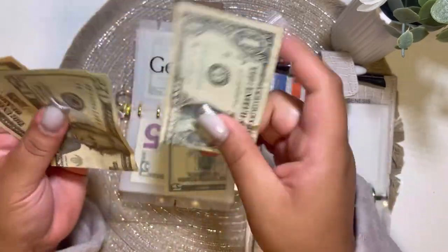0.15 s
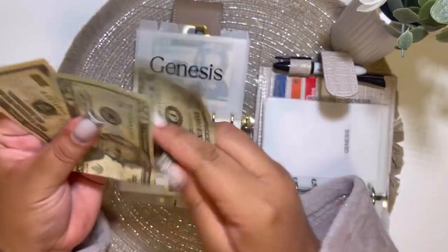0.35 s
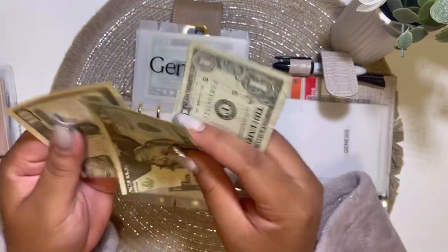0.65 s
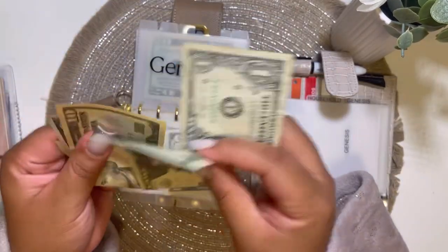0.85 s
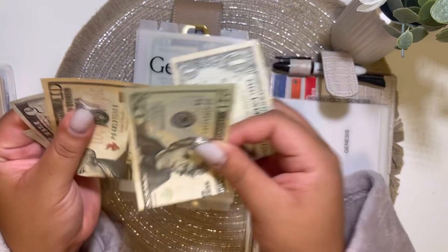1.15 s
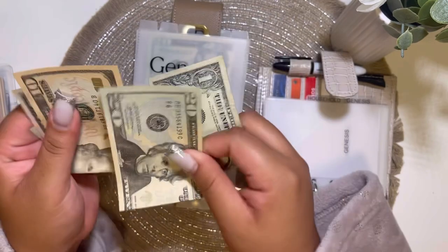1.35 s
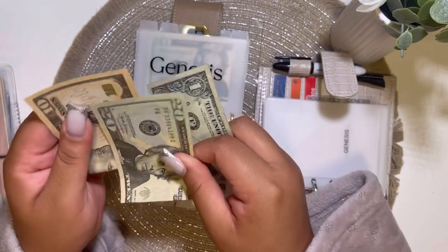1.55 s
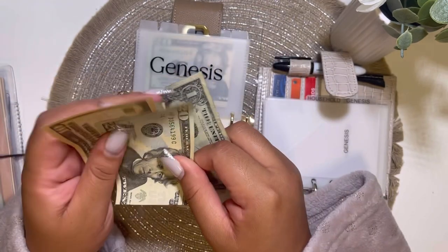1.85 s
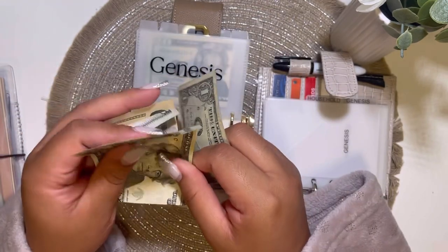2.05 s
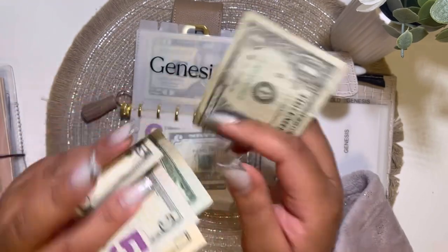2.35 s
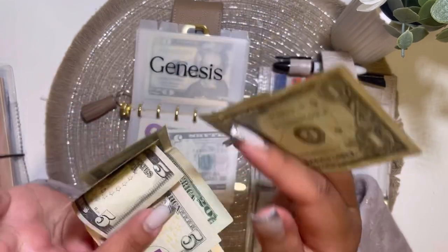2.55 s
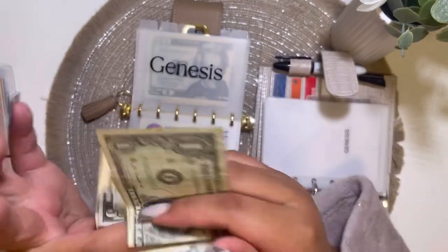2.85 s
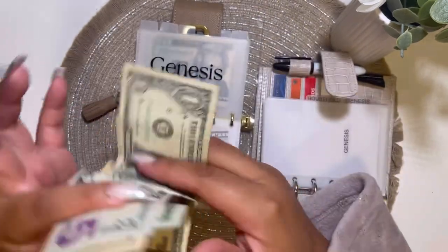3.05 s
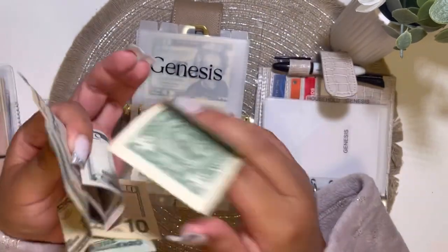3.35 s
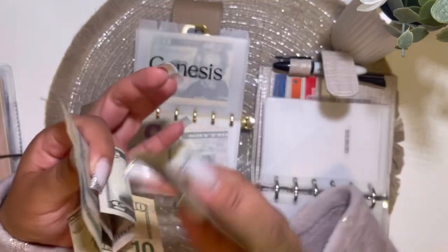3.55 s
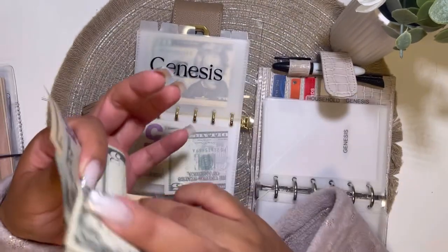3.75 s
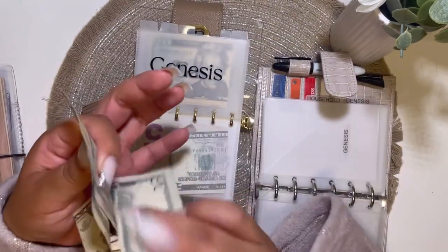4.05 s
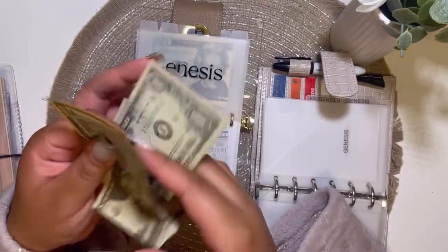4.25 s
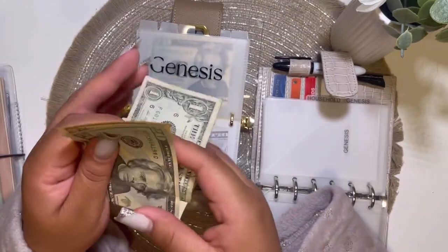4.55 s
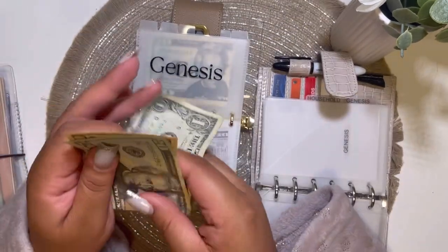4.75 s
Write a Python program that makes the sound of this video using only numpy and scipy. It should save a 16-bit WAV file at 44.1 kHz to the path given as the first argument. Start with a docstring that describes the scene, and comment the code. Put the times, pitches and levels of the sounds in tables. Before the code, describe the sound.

Close stereo sound of worn banknotes counted by hand over a desk in a small, quiet room. Light, grainy rubbing opens, with crisp snaps at about 0.3 and 0.4 seconds and a busier swish and crackle from 0.5 to 0.7. Softer dragging follows, then a clear swish with a bright snap near 1.3. Gentle rubbing continues until firmer swishes around 1.95 to 2.25, the last one strong. After a short lull, the loudest passage comes from 2.75 to 3.0: hard creases cracking over vigorous rustling and a low puff of air. Crackles thin out until about 3.25, with a quiet stretch after. Another tight cluster of swishes and snaps runs from 3.6 to 3.9. The end is lighter: faint crackles and fizzy rubbing after 4.1, one distinct flick near 4.7, then subdued rustling. Soft finger dabs, low hand rumble and faint room air lie beneath.

```python
"""Banknotes counted by hand

Worn banknotes are counted over a desk in a small room, close to a two-port microphone.
Bills rub across each other and the fingers: dense stick-slip grains through the sheet's wandering resonances.
Creases snap through and send bending waves along the sheet, whose low notes arrive late.
Finger pads dab softly, the hands stir a low rumble, and desk and room reflect the paper over still air."""
import sys
import numpy as np
from scipy import signal
from scipy.fft import rfft, irfft, next_fast_len
from scipy.io import wavfile

SR = 44100
rng = np.random.default_rng(int(sys.argv[2]) if len(sys.argv) > 2 else 0)


def output_pcm(signal):
    """Save a mono or channel-first signal as 16-bit PCM at the path in sys.argv[1].

    Samples are clipped to [-1, 1] before scaling.
    """
    pcm = np.clip(np.atleast_2d(signal).T, -1, 1) * 32767
    wavfile.write(sys.argv[1], SR, np.round(pcm).astype(np.int16))


N = 215604
TIME = np.arange(N) / SR


def from_db(db):
    """Amplitude factor of a level in dB."""
    return 10 ** (np.asarray(db) / 20)


def rms_one(x):
    """Scale to an rms of 1."""
    return x / np.sqrt(np.mean(x ** 2) + 1e-20)


def at_hz(points, hz):
    """Read a spectrum on a log-frequency axis."""
    point_hz, value = np.transpose(points)
    return np.interp(np.log(np.maximum(hz, 1)), np.log(point_hz), value)


def in_time(rows):
    """Each column of a curve, at every sample."""
    time_s, *columns = np.transpose(rows)
    return [np.interp(TIME, time_s, column) for column in columns]


def drift(rate):
    """Smooth chance with rms 1, about rate new values a second."""
    knots = rng.standard_normal(int(rate * N / SR) + 2)
    return rms_one(np.interp(TIME * rate, np.arange(len(knots)), knots))


def bandpass(x, low_hz, high_hz):
    """The part of a sound between two edges."""
    return signal.sosfilt(signal.butter(2, [low_hz, high_hz], "band", fs=SR, output="sos"), x)


def treble(x, edge_hz):
    """The part of a sound above an edge."""
    return signal.sosfiltfilt(signal.butter(3, edge_hz, "high", fs=SR, output="sos"), x)


def colour(x, spectrum):
    """Causal minimum-phase filter with the given spectrum; white noise keeps its power."""
    size = 2 * next_fast_len(N)
    gain = rms_one(from_db(at_hz(spectrum, np.fft.rfftfreq(size, 1 / SR))))
    # folding the cepstrum forward in time makes the filter causal
    cepstrum = irfft(np.log(gain))
    cepstrum[1:size // 2] *= 2
    cepstrum[size // 2 + 1:] = 0
    response = np.exp(rfft(cepstrum))
    return irfft(rfft(x, size) * response)[..., :N]


def tilt_db(hz, low_db, high_db):
    """The whole sheet sounds below about 1 kHz, single fibres above 5 kHz."""
    return at_hz([(650, low_db), (1500, 0.032), (4000, 0.045), (6300, high_db)], hz)


def bell(hz, centre_hz, octaves):
    """A resonance hump of height 1."""
    return np.exp(-(np.log2((hz + 1) / centre_hz) / octaves) ** 2)


def hump(hz, centre_hz, octaves):
    """A fold gathers the middle range into one resonance, at the cost of the rest of that range."""
    middle = 1 - tilt_db(hz, 0.82, 0.84)
    return bell(hz, centre_hz, octaves) - 0.46 * middle


def handling():
    """Drags and swishes add in power; each lends the paper its colour as far as it dominates.
    Gives friction, fizz, drumming, fold resonance and its height at every sample."""
    # a bill drawn steadily across the others; fizz of the fibres and drumming of the sheet are relative:
    # start_s, length_s, friction_db, fizz_db, drumming_db, fold_hz, fold_height_db
    drag_rows = [(0.0, 0.21, -56, 8.5, -0.5, 3570, 3), (0.316, 0.35, -54, 5.5, 9, 2500, 1),
                 (0.71, 0.23, -53.5, 7.5, 1, 2400, 0), (0.964, 0.084, -55, 5.5, -1.5, 2510, 4),
                 (1.455, 0.51, -55.5, -5, 0.5, 3000, -6.5), (2.304, 0.115, -64, 7, 4.5, 2060, 2.5),
                 (2.575, 0.15, -54, 4.5, 9, 1860, 6), (2.782, 0.374, -47.5, 4.5, -3.5, 2600, 7.5),
                 (3.32, 0.29, -62.5, -6.5, 9.5, 1770, 12), (4.154, 0.34, -55, 2.5, -0.5, 3000, 5),
                 (4.582, 0.23, -55, 0, 3, 2200, 3)]
    # a bill pulled free or pushed home in one swish; swell and fade are roughly the time per 20 dB:
    # fastest_s, swell_s, fade_s, friction_db, fizz_db, drumming_db, fold_hz, fold_height_db
    swish_rows = [(0.01, 0.05, 0.088, -49, 8.5, 10, 3570, -1), (0.40, 0.047, 0.11, -47, 5, 0, 2800, 5),
                  (0.495, 0.09, 0.089, -49.5, 11.5, 5.5, 2400, 2),
                  (0.592, 0.071, 0.054, -39.5, 2, 0, 2000, -8),
                  (1.103, 0.064, 0.058, -43.5, -3.5, -5, 4430, 12),
                  (1.28, 0.042, 0.1, -36.5, -2.5, -11.5, 3200, 12),
                  (1.39, 0.28, 0.27, -45.5, 4.5, -4.5, 3300, 5),
                  (1.731, 0.08, 0.035, -44.5, -6, -3, 3400, 3),
                  (1.961, 0.25, 0.15, -41, -9, -4, 1970, -0.5), (2.16, 0.1, 0.091, -41, -7, 4.5, 1690, 5.5),
                  (2.237, 0.062, 0.05, -34.5, 1, -9, 2060, -0.5),
                  (2.765, 0.025, 0.12, -44, 8, 0.5, 2780, 20), (2.835, 0.08, 0.13, -39, -10.5, -1, 2600, 2),
                  (2.98, 0.1, 0.17, -48.5, 12.5, -7, 2800, -4), (3.2, 0.12, 0.15, -42.5, 4, 1.5, 3300, -3),
                  (3.665, 0.042, 0.06, -38, 1, -3.5, 1900, 10),
                  (3.703, 0.047, 0.052, -39, -4, 2.5, 2030, 1),
                  (3.878, 0.095, 0.041, -40.5, -6, 3, 1900, 0),
                  (4.235, 0.13, 0.095, -58.5, 22, 9, 3000, -6),
                  (4.672, 0.088, 0.017, -44, -2, 8.5, 2400, 0)]
    # bills merely held: friction_db, fizz_db, drumming_db, fold_hz, fold_height_db
    resting_grip = (-86, 2, 2, 2000, 4.5)
    drag_attack_s, drag_release_s = 0.041, 0.1   # roughly the time to gain or lose 20 dB
    round_top = 0.11   # hands cannot turn sharply: share of a swell or fade over which its crest is rounded

    t = TIME[::40]
    moves = [(start, start + length, drag_attack_s, drag_release_s, *sound)
             for start, length, *sound in drag_rows]
    moves += [(fastest, fastest, *rest) for fastest, *rest in swish_rows]
    powers = [np.full(len(t), from_db(resting_grip[0]) ** 2)]
    shades = [resting_grip[1:]]
    for start, end, attack, release, level_db, *shade in moves:
        # distance from the move, in steps of 20 dB
        away = np.maximum(start - t, 0) / attack + np.maximum(t - end, 0) / release
        away = np.hypot(away, round_top) - round_top
        powers.append(from_db(level_db - 20 * np.minimum(away, 10)) ** 2)
        shades.append(shade)
    total = np.sum(powers, axis=0)
    blend = np.transpose(powers / total) @ np.array(shades)
    return in_time(np.column_stack([t, 10 * np.log10(total), blend]))


def slips(per_s, spread_db):
    """Tiny stick-slip releases at random moments, of uneven size; rms 1."""
    sizes_db = spread_db * np.minimum(rng.exponential(1, N), 4)
    sizes = from_db(sizes_db) * rng.choice([-1, 1], N)
    return rms_one(sizes * (rng.random(N) < per_s / SR))


def rubbing(judder_db, patchy_db, bend_octaves, crinkle_db):
    """Dense slips and a few larger crinkles excite the sheet, whose resonances wander as it bends."""
    friction_db, fizz_db, drumming_db, fold_hz, fold_height_db = handling()
    crinkles = from_db(crinkle_db) * slips(per_s=90, spread_db=3.0)
    grains = [slips(per_s=7000, spread_db=2.5) + crinkles for _ in range(2)]
    level_db = friction_db + judder_db * drift(140)
    edges = np.geomspace(215, 12500, num=25)
    out = np.zeros(N)
    for k, (low, high) in enumerate(zip(edges, edges[1:])):
        hz = np.sqrt(low * high)
        # neighbouring bands take turns at the two grain streams and alternate in sign
        band = bandpass(grains[k % 2], low, high) * (-1) ** k
        shade_db = tilt_db(hz, 0.84, 0) * drumming_db + tilt_db(hz, 0, 0.81) * fizz_db
        shade_db += hump(hz, fold_hz, bend_octaves) * fold_height_db
        out += band * from_db(level_db + shade_db + patchy_db * drift(35))
    return out


def top_octave(bills, edge_hz):
    """What firm rubbing adds to the highest treble, or light rubbing takes from it."""
    neutral_db, follows, range_db = -51, 0.58, 7.5   # neutral friction, dB per dB of friction, largest move
    friction_db = handling()[0]
    lift_db = np.clip(follows * (friction_db - neutral_db), -range_db, range_db)
    return (from_db(lift_db) - 1) * treble(bills, edge_hz)


def rumble(low_hz, top_hz):
    """Soft low noise of stirred air, swelling as a hand or a flapping bill wafts air at the microphone."""
    # wafts, levels ahead of the mix; at the half length the power is down to 1/e:
    # strongest_s, level_db, half_length_s
    waft_rows = [(0.325, -57.5, 0.016), (0.53, -63, 0.18), (1.12, -64.5, 0.033), (1.62, -71, 0.07),
                 (1.95, -63.5, 0.059), (2.22, -67, 0.1), (2.78, -64, 0.14), (2.94, -49.5, 0.029),
                 (3.035, -57, 0.02), (3.19, -64.5, 0.12), (3.735, -57.5, 0.025), (3.88, -70, 0.04),
                 (4.28, -69.5, 0.093), (4.87, -63, 0.05)]
    stir_db = -75   # between wafts, ahead of the mix
    power = from_db(stir_db) ** 2
    for s, level_db, half_length in waft_rows:
        power = power + from_db(level_db) ** 2 * np.exp(-((TIME - s) / half_length) ** 2)
    air = bandpass(rng.standard_normal(N), low_hz, top_hz)
    return rms_one(air) * np.sqrt(power)


def still_air(level_db):
    """Steady noise in the colour of the quiet room."""
    # still air of the room, relative density: pitch_hz, density_db (per Hz)
    hush_spectrum = [(25, -8), (50, 10), (75, 5), (130, -2), (300, 5.5), (800, -33.5), (2000, -11),
                     (4000, -34), (11000, -55.5), (13500, -64.5)]
    return from_db(level_db) * colour(rng.standard_normal(N), hush_spectrum)


def snaps(crease_db, crease_octaves, crackle_db, uneven_db, tick_db, push_db, bass_lag_s, bend_hz):
    """Each snap is a tick, a burst of breaking creases and a push on the sheet, spread out as a bending wave."""
    # the clearest creases giving way and edges flicking free; level ahead of a gain that grows with length,
    # fizz and flex relative to it, knock the hollow note of the sheet:
    # moment_s, level_db, length_s, crease_hz, fizz_db, flex_db, knock_hz
    snap_rows = [(0.0282, -44.5, 0.0024, 7840, 5, 13, 700), (0.1944, -54, 0.00089, 7200, 25.5, 3, 600),
                 (0.3022, -32.5, 0.0027, 5570, 2, 3, 570), (0.306, -39, 0.0051, 5660, 2, 9.5, 260),
                 (0.3996, -31, 0.013, 3570, -3, 4, 497), (0.551, -27, 0.0063, 2480, -3.5, 2, 693),
                 (0.583, -28.5, 0.0056, 4000, -14, -5, 850), (0.634, -36.5, 0.0075, 1400, -25, 7.5, 600),
                 (0.697, -32.5, 0.0076, 2450, -1, -9, 640), (1.3034, -24.5, 0.002, 3400, -5.5, -13, 470),
                 (1.4824, -41.5, 0.0057, 3200, -10, 0, 600), (1.738, -38, 0.007, 3300, -3, 5.5, 660),
                 (2.034, -40, 0.0075, 2100, -9, 6, 380), (2.1622, -34.5, 0.012, 3750, -2, -3, 760),
                 (2.1782, -32.5, 0.0025, 2100, -2, 5.5, 590), (2.242, -33.5, 0.0094, 5900, -2.5, 8, 543),
                 (2.457, -49.5, 0.0019, 2400, -8, -8, 600), (2.753, -29.5, 0.0057, 2750, -8, -22, 400),
                 (2.816, -30.5, 0.011, 2200, -24, 3, 570), (2.8442, -19, 0.0029, 6470, -1.5, 7, 412),
                 (2.9191, -17.5, 0.0056, 1600, -1.5, 2, 320), (2.9522, -19, 0.0032, 1190, -0.5, 7.5, 526),
                 (3.026, -30.5, 0.0079, 2000, -15.5, 5, 500), (3.116, -29, 0.0099, 3900, 1.5, -30, 560),
                 (3.136, -29, 0.01, 1690, -10, -1, 467), (3.17, -40.5, 0.011, 7950, 8, -2, 600),
                 (3.2047, -31.5, 0.011, 8760, 1.5, -12, 800), (3.2394, -44, 0.0083, 1100, 9, 15, 493),
                 (3.617, -38, 0.0032, 2110, -9, -11, 510), (3.679, -31, 0.012, 2000, -16, 5, 458),
                 (3.696, -30.5, 0.0054, 1840, 4.5, -12, 480), (3.7103, -31.5, 0.0053, 6300, 1.5, 4.5, 470),
                 (3.81, -40, 0.0092, 1700, -15, 8.5, 530), (3.842, -34, 0.015, 7700, -3.5, 1, 540),
                 (3.871, -30, 0.0055, 8000, -1.5, 0, 540), (3.8767, -28.5, 0.0087, 2900, -2.5, 5.5, 450),
                 (3.8864, -24.5, 0.0055, 3800, 1.5, 2, 501), (4.096, -55, 0.0034, 1900, -13, 1.5, 600),
                 (4.1232, -43.5, 0.0087, 6030, -3.5, -3.5, 400), (4.1332, -40, 0.0041, 6500, -7, 0, 300),
                 (4.2426, -39, 0.0044, 5940, -4.5, -2, 440), (4.426, -52.5, 0.005, 6400, -6, 17, 380),
                 (4.677, -30, 0.0086, 2100, -4, 4, 690), (4.719, -41, 0.0022, 1500, -6, 8, 670),
                 (4.8367, -48, 0.0084, 2100, 3, 11, 330)]
    sheet_low_hz = 170   # a bill is too small to radiate a crease's crackle well below this
    even_snap_s = 0.012   # a snap this long rises as slowly as it dies; shorter ones start more suddenly

    size = 8192
    lead = size // 8
    t = (np.arange(size) - lead) / SR
    hz = np.fft.rfftfreq(size, 1 / SR)
    # bending waves travel slower at low pitch, so the bass arrives late
    lag = bass_lag_s / (1 + (hz / bend_hz) ** 2)
    bending = np.exp(-2j * np.pi * np.cumsum(lag - lag[-1]) * SR / size)
    impulse = np.exp(-2j * np.pi * hz * lead / SR)
    out = np.zeros(N + 2 * size)
    for s, level_db, length, crease_hz, fizz_db, flex_db, knock_hz in snap_rows:
        rise = length * length / (length + even_snap_s)
        decay = length - rise
        envelope = np.exp(-np.maximum(-t / rise, t / decay))
        noise, sizes = rng.standard_normal((2, size))
        burst = noise * from_db(uneven_db * sizes) * envelope
        # only a sudden snap has a clear tick
        tick = from_db(tick_db) * impulse / (1 + (rise / 0.0026) ** 2)

        ring_db = crease_db * hump(hz, crease_hz, crease_octaves)
        shade_db = crackle_db + ring_db + tilt_db(hz, flex_db - 5.0, fizz_db)
        crackle = (rfft(burst / np.linalg.norm(burst)) + tick) * from_db(shade_db)
        crackle *= hz / np.hypot(hz, sheet_low_hz)
        push = from_db(push_db + flex_db) * impulse * bell(hz, knock_hz, octaves=0.55)
        wave = irfft((crackle + push) * bending)
        start = round(s * SR)
        out[start:start + size] += wave * from_db(level_db) * np.sqrt(length / 2 * SR)
    return out[lead:lead + N]


def dabs(swell_s):
    """A soft finger pad sets the held bills swinging for a few cycles."""
    # finger pads dabbing the bills, peaks of the envelope ahead of the mix: start_s, peak_db, pitch_hz
    dab_rows = [(0.301, -52, 168), (0.908, -46, 280), (1.102, -52, 214), (1.306, -58, 305),
                (1.72, -48, 274), (2.412, -53.5, 284), (2.567, -54, 330), (2.661, -45, 294),
                (3.025, -43.5, 126), (3.049, -50.5, 231), (3.26, -43, 273), (4.124, -55.5, 285)]
    out = np.zeros(N)
    for s, peak_db, hz in dab_rows:
        t = TIME[:N - round(s * SR)]
        envelope = t / swell_s * np.exp(1 - np.minimum(t / swell_s, 50))
        out[N - len(t):] += from_db(peak_db) * envelope * np.sin(2 * np.pi * hz * t)
    return out


def desk_bounce(x, dull_hz):
    """A slightly dulled copy from the desk below the hands, which gives the paper a hollow, ribbed colour."""
    bounce_s, bounce_db = 0.001468, -14   # mean delay and level after the direct sound
    sway = 0.064   # rms share by which moving hands change the delay
    delay = bounce_s * (1 + sway * drift(2))
    dulled = signal.sosfiltfilt(signal.butter(1, dull_hz, fs=SR, output="sos"), x)
    return from_db(bounce_db) * np.interp(TIME - delay, TIME, dulled)


def echoes(x, t60_s, gap_s):
    """Dense reflections dying away evenly: one set from the front, one from the sides."""
    t = np.arange(SR // 2) / SR
    tails = rng.standard_normal((2, len(t))) * from_db(-60 * t / t60_s) * (t > gap_s)
    tails /= np.linalg.norm(tails, axis=1, keepdims=True)
    return signal.fftconvolve(x[None], tails, axes=1)[:, :N]


def ports(front, lateral):
    """Frontal sound meets the ports with a phase and level difference; sound from the sides pulls them apart."""
    # the two ports; phase by which left leads, level left over right, power share of the sound from the sides:
    # pitch_hz, phase_rad, balance_db, apart (0-1)
    port_rows = [(60, 0, -.2, .2), (170, -.1, -2, .6), (450, -.2, -2.6, .9), (1000, 0, -2.2, .9),
                 (1600, 0, 0, .03), (2300, .15, -.6, .6), (3100, .7, -1, 1), (4100, .85, -.6, 1),
                 (4550, 1.6, -3, 1), (4900, 3.14, -4, 1), (5250, 5.0, -1, 1), (5850, 6.25, 0, .06),
                 (6200, 6.4, 0, .4), (7200, 7.7, 0, 1), (8400, 9.05, 0, .5), (9050, 9.42, 0, 0),
                 (9500, 9.6, 0, .2), (10700, 11, 0, .9), (11500, 11.9, 0, 1), (12100, 12.5, 0, .03)]
    size = next_fast_len(N + SR // 10, real=True)
    hz = np.fft.rfftfreq(size, 1 / SR)
    port_hz, *columns = np.transpose(port_rows)
    phase, balance_db, apart = [np.interp(hz, port_hz, column) for column in columns]
    sides = np.array([[1], [-1]])   # left, right
    field = rfft(front, size) + sides * np.sqrt(np.clip(apart, 0, 1)) * rfft(lateral, size)
    difference = np.exp(.5j * phase * sides) * from_db(.5 * balance_db * sides)
    return irfft(field * difference, size)[:, :N]


def scene():
    """Rubbing, snaps and finger dabs with desk and room reflections, over wafted and still air."""
    # colour of the paper at the microphone, relative density: pitch_hz, density_db (per Hz)
    paper_spectrum = [(22, -18), (50, -6.5), (200, -2.5), (300, 2.5), (385, 0), (540, 1.5), (950, -2),
                      (1350, 0), (2000, 1.5), (4000, 0.5), (5900, -2.5), (7200, 0), (8500, -0.5),
                      (10000, 1), (11200, -3.5), (12300, -17.5), (13800, -36.5)]
    bills = from_db(-3.0) * rubbing(judder_db=1.38, patchy_db=2.0, bend_octaves=0.61, crinkle_db=-10.5)
    bills += snaps(crease_db=7.5, crease_octaves=0.2, crackle_db=-0.5, uneven_db=3,
                   tick_db=-2, push_db=-5, bass_lag_s=0.0279, bend_hz=105.4)
    bills += top_octave(bills, edge_hz=12000)
    paper = colour(bills, paper_spectrum) + from_db(-3) * dabs(swell_s=0.0059)

    bounce = desk_bounce(paper, dull_hz=5000)
    room = from_db(-12.5) * echoes(paper, t60_s=0.2, gap_s=0.0041)
    # small things on the desk scatter only the short waves
    scatter = from_db(-19) * echoes(treble(paper, edge_hz=1860), t60_s=0.047, gap_s=0.00094)
    air = from_db(1.5) * rumble(low_hz=42.4, top_hz=164) + still_air(level_db=-72)

    front = paper + bounce + room[0] + scatter[0] + air
    lateral = from_db(-3.0) * (room[1] + scatter[1]) + from_db(-10) * rumble(low_hz=42, top_hz=200)
    return ports(front, lateral)


def record(dry):
    """The top is cut steeply above 15.8 kHz."""
    return signal.sosfilt(signal.ellip(10, .1, 80, 15800, fs=SR, output="sos"), dry)


dry = scene()
out = record(dry)
output_pcm(out)
```